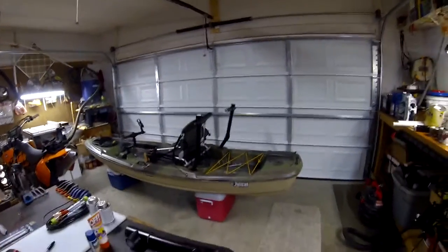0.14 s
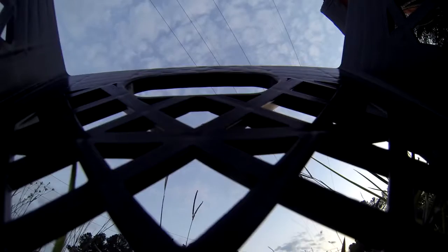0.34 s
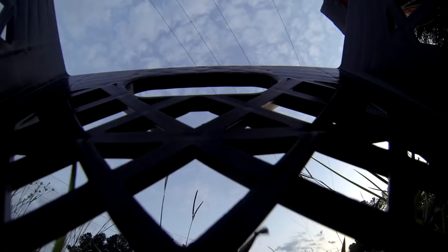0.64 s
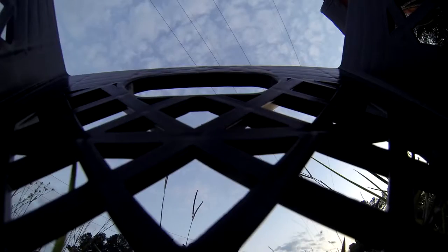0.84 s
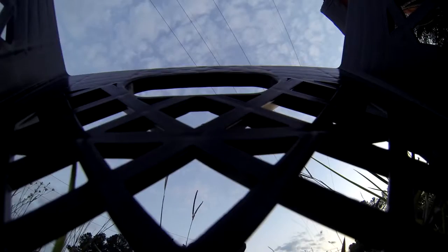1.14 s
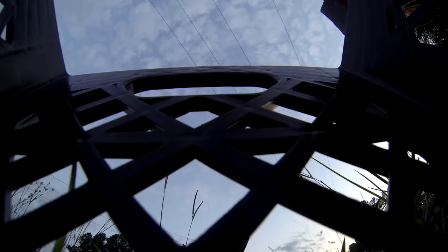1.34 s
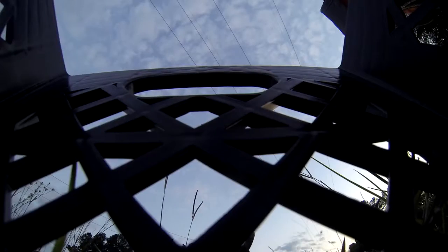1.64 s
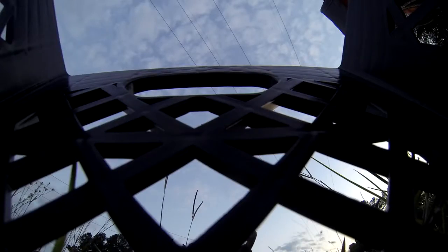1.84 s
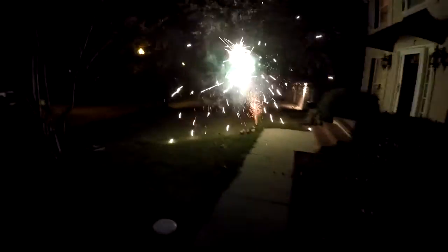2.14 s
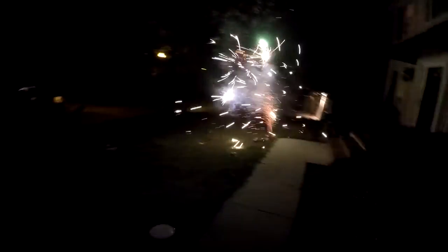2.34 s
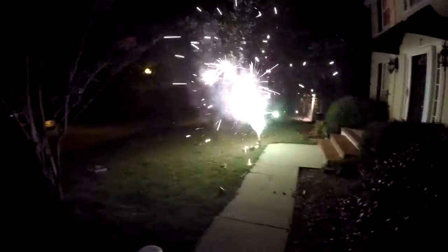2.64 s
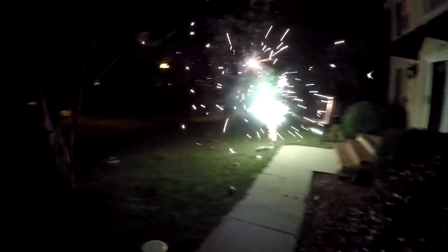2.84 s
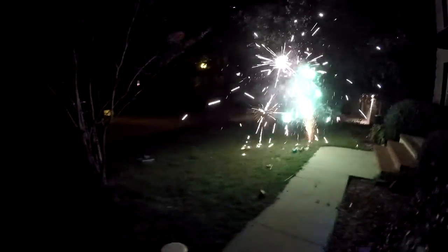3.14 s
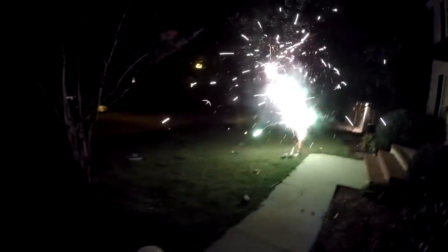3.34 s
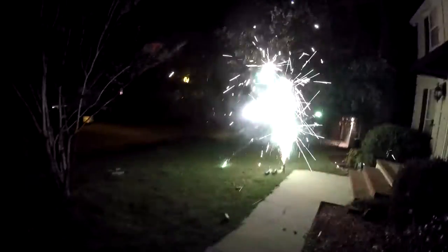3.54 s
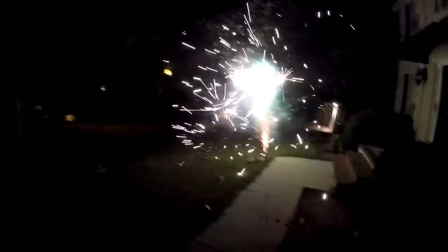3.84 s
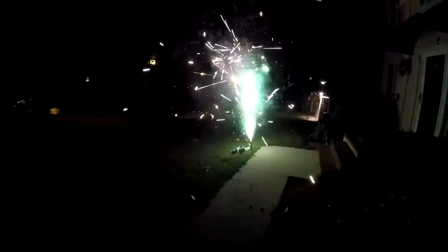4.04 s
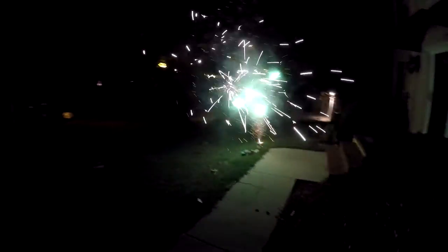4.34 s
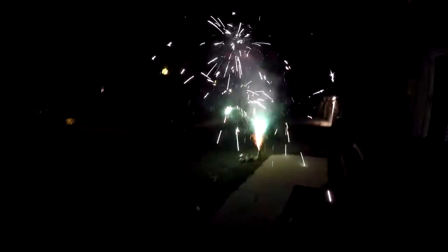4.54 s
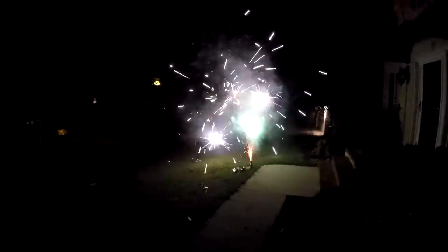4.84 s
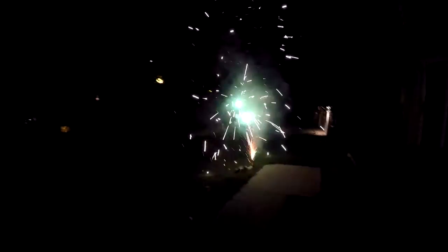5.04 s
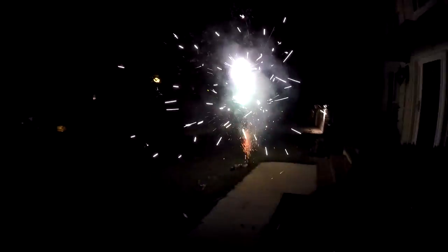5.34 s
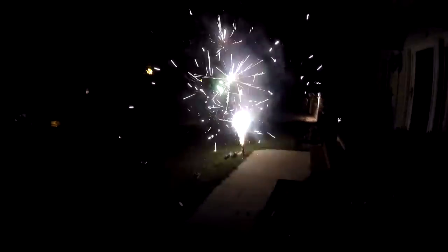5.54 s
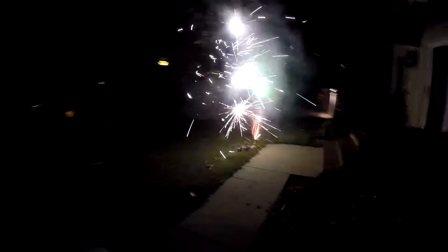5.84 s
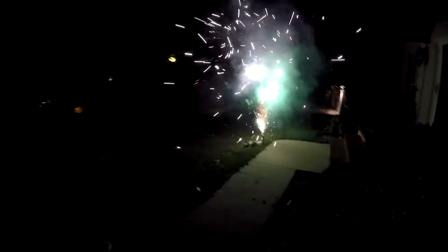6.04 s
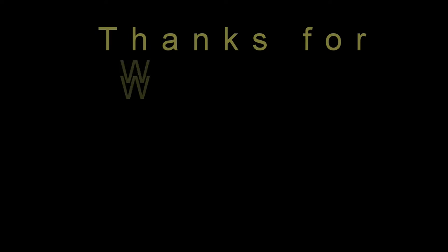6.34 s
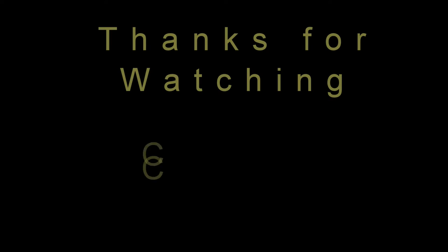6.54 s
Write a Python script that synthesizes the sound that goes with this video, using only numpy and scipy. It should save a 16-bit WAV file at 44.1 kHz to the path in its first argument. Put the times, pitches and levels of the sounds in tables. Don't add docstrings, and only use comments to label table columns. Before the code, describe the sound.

From 0 to 0.27 seconds a garage machine hums steadily, with a dull low handling thud dying at the start. After a tiny silence, 0.29 to 1.93 is a very quiet yard: soft distant air, thin insect hiss, faint high electronic whine and one barely audible tick near 0.78. Another short gap, then at 1.98 a ground firework fountain bursts in hard, its loudest crack almost immediately. Sharp, dry pops follow at roughly ten to twenty-five per second, uneven in size, grouped in volleys with tiny lulls. Each snaps brightly with a short boxy ring, fast slaps from path and house wall, and a brief diffuse tail. Beneath are steady spark hiss and a low tube roar that slowly weakens. Low wind rumbles on the microphone, strongest around 4.3, again near 5.7. Crackling thins slightly late but stays loud, cutting off at 6.15 into silence.

```python
import sys
import numpy as np
from scipy import signal
from scipy.fft import rfft, irfft
from scipy.io import wavfile
from scipy.ndimage import uniform_filter1d

SR = 44100
rng = np.random.default_rng(int(sys.argv[2]) if len(sys.argv) > 2 else 0)


def invert_db(x):
    u = np.asarray(x, float) / 20
    return 10 ** u


def generate_wav(sig):
    pcm = np.round(np.clip(np.atleast_2d(sig).T, -1, 1) * 32767).astype(np.int16)
    wavfile.write(sys.argv[1], SR, pcm)


N = 294611

# start in seconds, end in seconds.
SHOTS = [
    (0, .2682),
    (.2885, 1.9285),
    (1.9815, 6.149),
]
# frequency in Hz, density in dB per Hz.
GARAGE_SPECTRUM = [(18, -29), (30, 6), (75, -1), (133, 1), (173, -14), (225, -9), (639, -11.5), (1020, -8),
                   (1170, -14), (2180, -20), (3400, -31), (12300, -39.5), (15500, -38)]
# frequency in Hz, density in dB.
YARD_SPECTRUM = [(12, -34), (20, 1), (70, -2), (140, -4), (240, -10), (500, -15), (1000, -22.5),
                 (2200, -27), (4000, -31.5), (6500, -37.5), (9000, -43.5), (15500, -46)]
# frequency in Hz, level in dB, decay time T60 in seconds.
INSECTS = [(4950, -83, .04), (5640, -86, .05), (2700, -78, .014)]
# frequency in Hz, density in dB.
SPRAY_SPECTRUM = [(60, -47), (110, -7.5), (300, 2), (480, -2.5), (780, 4.5), (1200, -2.5), (1550, -10),
                  (3000, -10), (5750, -6), (11500, -21.5), (15500, -21.5)]
# peak in seconds, level in dB, fading time in seconds.
GUSTS = [
    (1.991, -37, 0.096),
    (2.45, -48, .1),
    (2.72, -49, 0.17),
    (4.26, -34, .22),
    (5.25, -42.5, 0.23),
    (5.65, -37, 0.087),
    (5.88, -38.5, .15),
]
# frequency in Hz, density in dB.
TAIL_SPECTRUM = [(60, -43), (120, -12.5), (260, 1.5), (480, -5), (790, -2.2), (1250, -3), (1520, -13.5),
                 (2800, -8.5), (4200, -8.5), (5700, -13.5), (7000, -12.5), (11500, -22.5), (14500, -25),
                 (16000, -32.5)]
# frequency in Hz, decay time T60 in seconds.
TAIL_T60 = [(150, 0.099), (800, 0.11), (3000, 0.15), (8000, 0.2), (14000, 0.25)]
# frequency in Hz, signed strength, decay time T60 in ms.
CASE_MODES = [
    (725, -.78, 11),
    (1225, 1.04, 2.4),
    (2500, .19, 8),
    (4190, .25, 5.5),
    (5470, .31, 3),
    (7350, .51, 2),
]
# frequency in Hz, level in dB, decay time T60 in ms.
FLANK_MODES = [(2232, -8.5, 6), (2783, -8, 10.5), (3447, -4.5, 4.27), (4146, -5.5, 5.75),
               (5000, -3.5, 3.45), (5770, -6.5, 8.7), (7400, -1.5, 0.57), (11400, -8.5, 1.85)]
# crack in seconds, peak in dB.
BURSTS = [(1.9932, 6.5), (2.0388, -13.5), (2.0433, 3.5), (2.0546, -10), (2.073, -1.5), (2.089, -9),
          (2.1208, -7), (2.1308, -9.5), (2.1383, -0.5), (2.1913, -7), (2.2101, 0.3),
          (2.3041, -1.5), (2.3301, -4.5), (2.3856, -4), (2.4038, -6), (2.451, 1), (2.5112, -9.5),
            (2.5158, -10), (2.5215, -4.5), (2.5252, -6.5), (2.5415, -4.5), (2.5498, -2.5), (2.5716, -10.5),
            (2.5963, -0.5), (2.64, -2), (2.661, -6.5), (2.6908, -5.5), (2.7115, -7.5), (2.7332, 1.5),
            (2.7593, -13), (2.7972, -9.5), (2.818, -9), (2.8356, -5.5), (2.8438, -5.5), (2.9035, -7),
            (2.9382, 0), (2.9536, -8.5), (2.976, -5.5),
          (3.067, -6.5), (3.0713, -5.5), (3.1056, 0.5), (3.1192, -5.5), (3.1325, -2), (3.1498, -4),
            (3.1579, -6.5), (3.1737, -10.5), (3.2002, -4), (3.2123, -4), (3.2368, -2), (3.2463, -6.5),
            (3.2551, -5), (3.2773, -15), (3.2968, -3.5), (3.3128, -9), (3.319, -4.5), (3.3242, -4.5),
            (3.347, -8), (3.3764, -3), (3.4131, -1.5), (3.4225, -9), (3.4364, -2.5), (3.4538, -4),
          (3.5264, -25.5), (3.5444, -20), (3.5551, -5), (3.5876, -0.5), (3.5981, -12), (3.6062, -1),
            (3.6143, -3), (3.6229, -8.5), (3.6368, -5.5), (3.6572, -3), (3.6649, -7.5), (3.6765, -7),
            (3.6956, -13.5), (3.7066, -5.0), (3.7558, -2), (3.7913, -16), (3.8044, -2), (3.8115, -6),
            (3.8542, -8.5), (3.8629, -2), (3.871, -3), (3.8965, -8.5), (3.9236, -2), (3.979, -12.5),
            (4.0049, -0.2), (4.069, -11.5), (4.0809, -6), (4.0985, -11.5),
          (4.1697, -19), (4.1734, -2), (4.2154, -0.5), (4.2202, -4.5), (4.2304, -1.5), (4.2479, -13),
            (4.2682, -8.5), (4.289, -6.5), (4.316, -3), (4.3363, -6), (4.3468, -4), (4.3788, -7.5),
            (4.3964, -8), (4.4578, -7.5), (4.4759, -10), (4.5223, -8), (4.5623, -11), (4.5737, -0.5),
            (4.5841, -2.0), (4.6543, -8), (4.664, -3.5), (4.7104, -26),
          (4.7447, -2.5), (4.757, -0.5), (4.7941, -5), (4.822, -2.5), (4.835, -1), (4.8425, -8.5),
            (4.8687, -2.5), (4.9031, -13), (4.9296, -2), (4.9371, -5), (4.9677, -4.5), (5.0057, -4),
            (5.0189, -9.5), (5.0254, -5), (5.0371, -8), (5.0755, -10.5),
          (5.1582, -2.5), (5.1699, -1.5), (5.2107, -2.5), (5.246, -4), (5.2696, -5.5), (5.287, -11.5),
            (5.2976, -15.5), (5.3225, -15.5), (5.339, -6), (5.3486, -4), (5.3595, -0.5), (5.4236, -2),
            (5.437, -13), (5.4805, -22), (5.4928, -21),
          (5.5191, -7.5), (5.5635, -10.5), (5.571, -9.5), (5.5788, -3), (5.5893, -7.5), (5.6025, -6),
            (5.6287, -11.5), (5.6676, -3), (5.7072, -8.5), (5.754, -3), (5.7621, -1), (5.8394, -2),
            (5.8489, -9), (5.8599, -2.5), (5.88, -4.5), (5.895, -7), (5.913, -6), (5.9219, 0), (5.959, 1),
            (6.0206, -0.5), (6.0543, -1.5), (6.1247, -10)]
STAR_DRAWS = rng.random((200, 5))

TIME_S = np.arange(N) / SR


def rms_one(x):
    return x / np.sqrt(np.mean(x ** 2) + 1e-20)


def at_hz(points, hz):
    table_hz, value = np.array(points).T[:2]
    return np.interp(np.log(hz), np.log(table_hz), value)


def clicks(s, size):
    return np.bincount(np.round(s * SR).astype(int), size, N)[:N] + 1e-18


def ring(x, hz, t60):
    radius = invert_db(-60 / (t60 * SR))
    angle = 2 * np.pi * hz / SR
    return signal.lfilter([0, np.sin(angle)], [1, -2 * radius * np.cos(angle), radius ** 2], x)


def passed(x, hz, kind):
    return signal.sosfilt(signal.butter(2, hz, kind, fs=SR, output="sos"), x)


def coloured(spectrum):
    hz = np.maximum(np.arange(N // 2 + 1) * SR / N, 1)
    white = rng.standard_normal(N)
    return rms_one(irfft(rfft(white) * invert_db(at_hz(spectrum, hz)), N))


def swell(power, rise_s, t60):
    up = np.exp(-1 / (rise_s * SR))
    down = invert_db(-120 / (t60 * SR))
    return np.sqrt(np.abs(signal.lfilter([1 - up], np.convolve([1, -up], [1, -down]), power)))


def garage():
    hum = invert_db(-41.5) * rms_one(passed(coloured(GARAGE_SPECTRUM), 105, "high"))
    thud_db = -30.5 - 20 * np.tanh((TIME_S / 0.064) ** 2)
    thud = invert_db(thud_db) * np.cos(2 * np.pi * 47 * (TIME_S - .002))
    return hum + thud


def camera_noise():
    hiss = invert_db(-84) * rms_one(passed(rng.standard_normal(N), [10000, 16000], "band"))
    whine_start_s, frame_hz, whine_hz = .3255, 29.97, 11290
    frame_phase = (TIME_S - whine_start_s) * frame_hz % 1
    gate = uniform_filter1d(1.0 * (frame_phase < .4), size=90)
    return hiss + invert_db(-76.5) * gate * np.sin(2 * np.pi * whine_hz * TIME_S)


def yard():
    air = invert_db(-54) * coloured(YARD_SPECTRUM)
    insects = sum(invert_db(db) * rms_one(ring(rng.standard_normal(N), hz, t60)) for hz, db, t60 in INSECTS)
    tick = invert_db(-55) * ring(clicks(np.array([.778]), [1]), hz=2650, t60=.06)
    return air + insects + tick + camera_noise()


def wind():
    level = invert_db(-50.5)
    for peak_s, db, fade_s in GUSTS:
        width_s = np.where(TIME_S < peak_s, .04, fade_s)
        level = level + invert_db(db) * np.exp(-((TIME_S - peak_s) / width_s) ** 2)
    return level * rms_one(passed(rng.standard_normal(N), [18, 55], "band"))


def spray():
    return invert_db(-39) * coloured(SPRAY_SPECTRUM)


def star_bursts():
    volleys = BURSTS
    s, peak_db = np.transpose(volleys)
    chance, wait, loss = STAR_DRAWS[:len(s), :3].T
    split = chance < .1
    later_s = s + np.interp(wait, [0, 1], (0.0046, .03))
    weaker_db = peak_db + np.interp(loss, [0, 1], (-25.5, -13.5))
    s = np.append(s, later_s[split])
    peak_db = np.append(peak_db, weaker_db[split])

    high, side = STAR_DRAWS[:len(s), 3:].T
    low_m, high_m, camera_m, distance_m = 1.6, 3.9, 1.5, 8.0
    height_m = low_m + (high_m - low_m) * high
    detour_m = np.hypot(distance_m, height_m + camera_m) - np.hypot(distance_m, height_m - camera_m)
    ground_ms = detour_m / .343
    ground_db = -1.5 + 0.31 * height_m
    wall_ms = np.interp(side, [0, 1], (12.8, 14.7))
    return s - 3 / SR, invert_db(peak_db), ground_ms, ground_db, wall_ms


def roar():
    s, size = star_bursts()[:2]
    power = clicks(np.append(s, 1.95), np.append(size ** 2, invert_db(3.0)))
    level = invert_db(-34.5 - 2.3 * (TIME_S - 2)) * swell(power, rise_s=0.0056, t60=.4)
    return level * rms_one(passed(rng.standard_normal(N), [72, 98], "band"))


def tail():
    s, size = star_bursts()[:2]
    power = clicks(np.append(s + 0.0004, 1.965), np.append(size ** 2, invert_db(-13.0)))
    rest, out = coloured(TAIL_SPECTRUM), 0
    for hz in 12800 / 2.0 ** np.arange(8):
        below = passed(rest, hz, "low")
        t60 = np.clip(at_hz(TAIL_T60, 1.56 * hz), .03, 1)
        out = out + (rest - below) * swell(power, 0.001, t60)
        rest = below
    return invert_db(-19.5) * out


def case(x, boom_db, edge_db):
    (boom_hz, boom_size, boom_ms), *edge_modes = CASE_MODES
    boom = boom_size * ring(x, boom_hz, boom_ms / 1000)
    edge = sum(size * ring(x, hz, ms / 1000) for hz, size, ms in edge_modes)
    out = invert_db(boom_db) * boom + invert_db(edge_db) * edge
    out = out - .5 * signal.lfilter(*signal.iirpeak(1520, 6, SR), out)
    return passed(out, 9500, "low")


def flank(x):
    out = 0
    for k, (hz, db, ms) in enumerate(FLANK_MODES):
        out = out + (-1) ** k * invert_db(db) * ring(x, hz, ms / 1000)
    return out


def scatter(s, size, count, first_ms, spread_ms):
    lag_ms = first_ms + spread_ms * rng.random((len(s), count))
    strength = size[:, None] * rng.standard_normal((len(s), count))
    return clicks((s[:, None] + lag_ms / 1000).ravel(), strength.ravel())


def bursts():
    s, size, ground_ms, ground_db, wall_ms = star_bursts()
    at_wall = s + wall_ms / 1000
    direct = clicks(s, size)
    ground = clicks(s + ground_ms / 1000, size * invert_db(ground_db))
    wall = clicks(at_wall, size * invert_db(rng.normal(0, 2, len(s))))
    hand = scatter(s, size, count=5, first_ms=1.3, spread_ms=.9)
    body = scatter(s, size, count=8, first_ms=2.2, spread_ms=3.2)
    eaves = scatter(at_wall, size, count=8, first_ms=-1.6, spread_ms=4)
    shrubs = scatter(at_wall, size, count=16, first_ms=3, spread_ms=22)

    fronts = case(direct, boom_db=0, edge_db=0) + case(ground, boom_db=-5, edge_db=0)
    grazing = invert_db(-10.5) * (hand + body / 2)
    grazing = grazing + invert_db(-18.5) * wall + invert_db(-17.0) * eaves + invert_db(-23.5) * shrubs
    glint = invert_db(-13) * ring(hand, 6500, .002)
    snap = invert_db(-13) * (direct + hand) + invert_db(-17) * (body + eaves) + invert_db(-7) * wall
    dull = case(wall, boom_db=-17.5, edge_db=-14)
    dull = dull + case(eaves, boom_db=-16.5, edge_db=-36.5)
    dull = dull + case(shrubs, boom_db=-33.5, edge_db=-26.0)
    return fronts + flank(grazing) + glint + passed(snap, [9500, 14000], "band") + dull


def scene():
    fountain = wind() + spray() + roar() + tail() + bursts()
    out = np.zeros(N)
    for (on_s, off_s), sound in zip(SHOTS, (garage(), yard(), fountain)):
        out = out + sound * (TIME_S >= on_s) * np.clip((off_s - TIME_S) / .003, 0, 1)
    return out[None]


def band_limit(x):
    return signal.sosfilt(signal.butter(12, 16480, fs=SR, output="sos"), x)


def record(dry):
    rounded = 0.89 * np.tanh(dry / .9) + 0.02515 * dry
    steep = signal.cheby2(12, 48, 15850, fs=SR, output="sos")
    return band_limit(signal.sosfilt(steep, rounded))


dry = scene()
out = record(dry)
generate_wav(out)
```